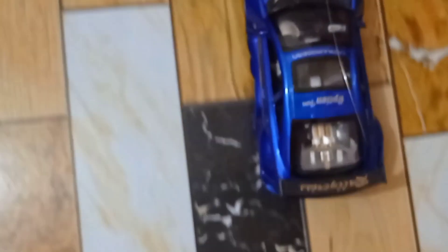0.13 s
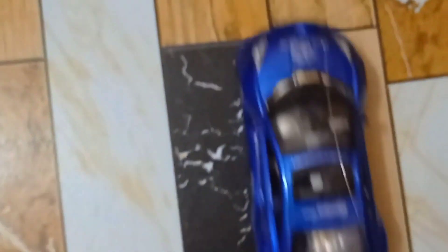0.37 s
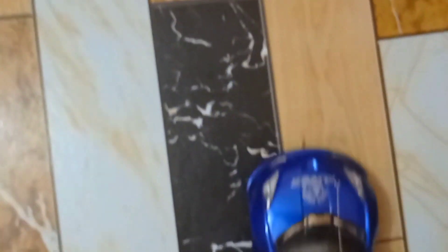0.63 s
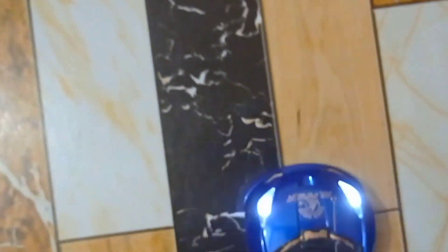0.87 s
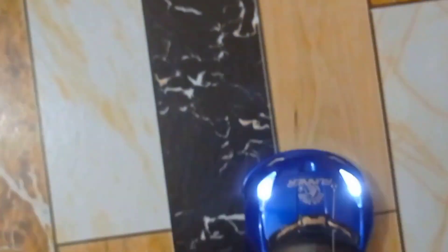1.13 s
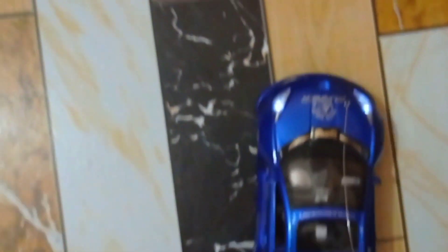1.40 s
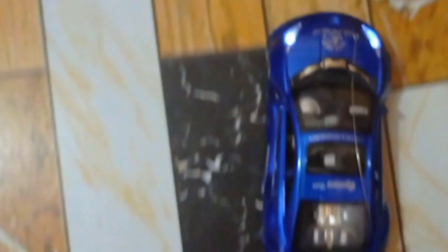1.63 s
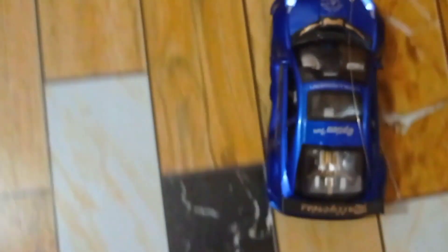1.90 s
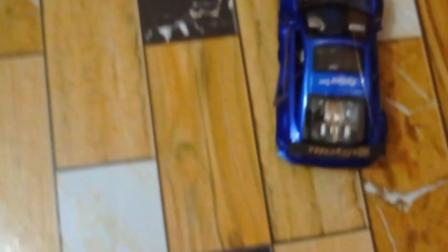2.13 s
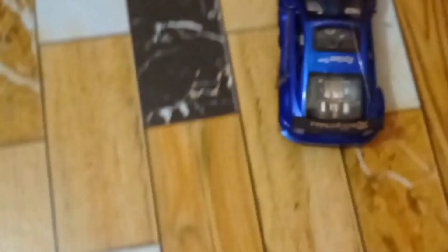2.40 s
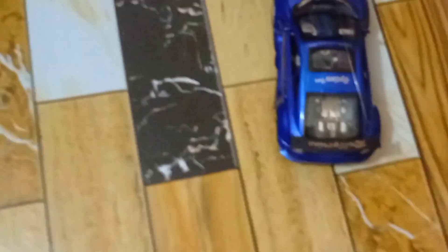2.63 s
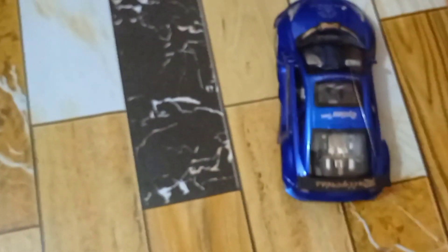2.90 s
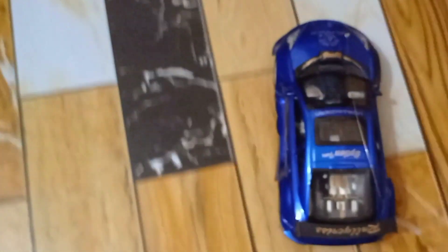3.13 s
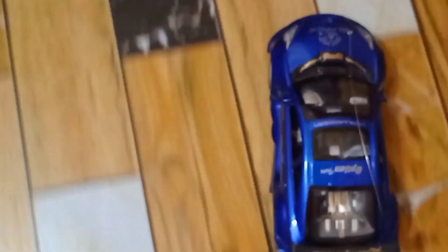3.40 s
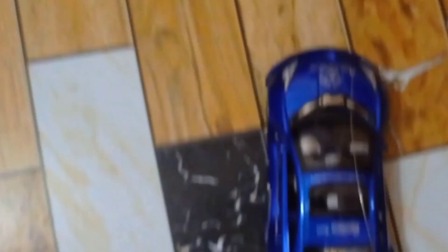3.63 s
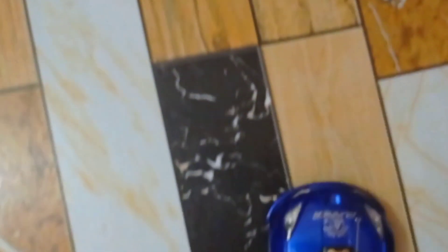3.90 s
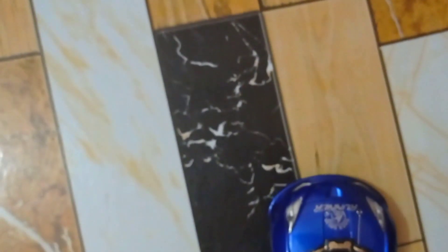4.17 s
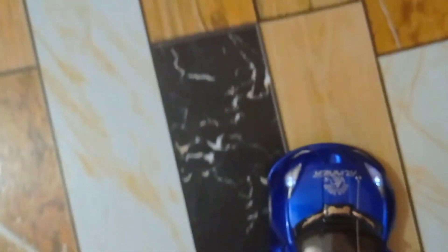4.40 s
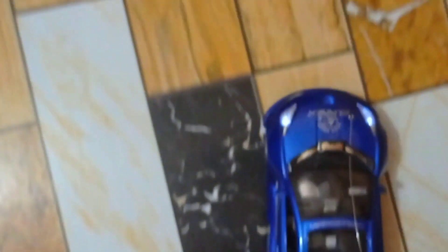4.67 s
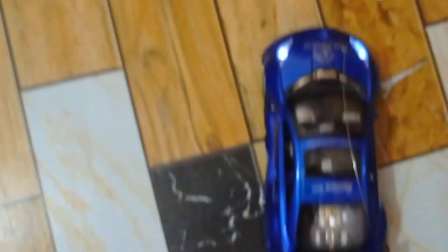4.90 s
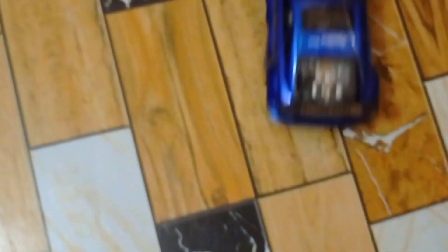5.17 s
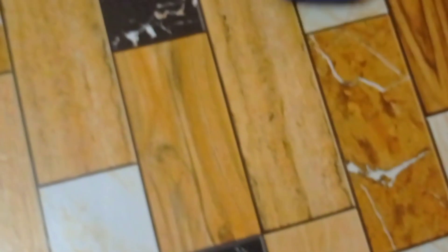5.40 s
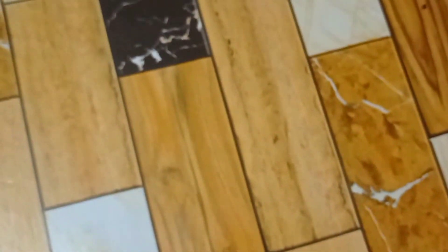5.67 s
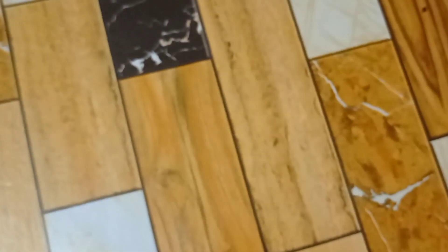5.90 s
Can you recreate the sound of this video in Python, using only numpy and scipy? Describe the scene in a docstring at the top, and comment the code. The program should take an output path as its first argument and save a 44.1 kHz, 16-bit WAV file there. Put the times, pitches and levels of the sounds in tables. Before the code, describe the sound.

In a quiet tiled room, a small toy car with a geared electric motor is heard close by. It is silent for an instant, then a gritty plastic whir with a thin gear whine starts abruptly, with ticks near 0.3 seconds and a hard knock at 0.7. Clustered rattling knocks and a brushing scrape mark a loud reversal around 0.9 to 1.05. The whir drops, swells again near 1.5, then fades from 2.2 into faint ticks. A dry controller snap comes at 2.6. From 2.9 the motor revs up, growing more tonal around 3.4, and stops by 3.95 with another snap. After near silence and small ticks, it builds from 4.3 to a strong whir near 5.1, bumping over joints; knocks at 5.4 precede its stop by 5.6. Soft hiss remains, then a weak whir and light ticks return from 5.8 to the end.

```python
"""Tiled floor of a quiet room: a small toy car with a geared electric motor runs back and forth below a mono microphone.
Random blows of the gear teeth rattle the plastic shell; the motor's turning orders glide through low resonances.
Decaying modes make the knocks and ticks of stops, reversals and tile joints, and the hand controller's snaps.
Filtered noise makes the underside's brushing, the air, the hiss and the low rolling in the floor."""
import sys
import numpy as np
from scipy import signal
from scipy.io import wavfile
from scipy.ndimage import uniform_filter1d

SR = 44100
rng = np.random.default_rng(int(sys.argv[2]) if len(sys.argv) > 2 else 0)


def volts_from_db(level):
    """Convert decibel levels to linear amplitude ratios."""
    exponent = np.asarray(level, float) / 20
    return 10 ** exponent


def store_wav(level_fs):
    """Save 16-bit WAV to argv[1]."""
    pcm = np.round(np.clip(np.atleast_2d(level_fs), -1, 1) * 32767)
    wavfile.write(sys.argv[1], SR, pcm.T.astype(np.int16))


N = 266319

# modes of the plastic shell: mode_hz, level_db, t60_s (before a blow's ring factor)
SHELL = [(358, 5.5, 0.08), (414.3, 6.5, 0.54), (443, 5.5, 0.053), (513, 2.5, 0.18), (654, 8.5, 0.081),
         (770, 12.5, 0.12), (1034, 7.5, 0.11), (1230, -3.5, 0.22), (1450, 7, 0.079), (1873, 4, 0.04),
         (2090, 11.5, 0.087), (2290, 21, 0.0053), (2638, 7, 0.23), (3224, 9.5, 0.22), (3620, 8.5, 0.045),
         (3820, 13.5, 0.034), (4294, 13.5, 0.022), (4750, 11.5, 0.13), (5100, 17.5, 0.0045),
         (5730, 9.5, 0.015), (6470, -4.5, .02)]
# wheels jolting over tile joints: centre_s, half_length_s, low_shell_db, floor_db
JOLTS = [(0.077, 0.14, -50.5, -51.5), (0.305, 0.12, -52.5, -59), (.664, 0.025, -33.5, -48),
         (.684, 0.01, -26, -39), (0.734, 0.16, -44, -46), (0.918, 0.011, -39, -72),
         (0.969, 0.021, -34.5, -67), (1.053, 0.34, -50, -54.5), (1.188, 0.047, -65, -64),
         (1.41, 0.063, -81, -66), (1.565, 0.061, -56, -56), (1.663, .05, -59, -55),
         (2.004, 0.039, -40, -60), (3.309, 0.048, -37.5, -72), (3.749, 0.17, -72, -61),
         (4.467, 0.062, -82, -55), (4.929, .06, -52, -63), (5.02, 0.074, -55, -78),
         (5.107, 0.082, -38, -47.5), (5.214, 0.037, -35, -48), (5.291, 0.078, -34.5, -51),
         (5.385, 0.068, -32.5, -52), (5.493, 0.04, -40, -52), (5.81, 0.15, -55, -57.5),
         (5.953, 0.07, -50.5, -62), (6.013, 0.032, -43, -64)]


def evened(x):
    """Scales a signal to rms 1."""
    return x / np.sqrt(np.mean(x ** 2) + 1e-20)


def read(points, hz):
    """Reads a spectrum table on a log-frequency axis."""
    point_hz, value = np.transpose(points)
    return np.interp(np.log(hz + 1), np.log(point_hz + 1), value)


def shaped(x, gain, size=1024):
    """Multiplies the short-time spectrum of x by gain(hz)."""
    hz, _, z = signal.stft(x, SR, nperseg=size, noverlap=size * 3 // 4)
    return signal.istft(z * gain(hz[:, None]), SR, nperseg=size, noverlap=size * 3 // 4)[1][:len(x)]


def bells(rows, column):
    """Power over time of brief events, each a smooth bell as high as the dB in its column."""
    power = np.zeros(N)
    for row in rows:
        bell = signal.windows.hann(round(2 * row[1] * SR) + 2) ** 4
        at = np.arange(len(bell)) + round(row[0] * SR) - len(bell) // 2
        inside = (at >= 0) & (at < N)
        power[at[inside]] += volts_from_db(2 * row[column]) * bell[inside]
    return power


def ring(weights_db, ring_factor, size=4096):
    """One blow on the shell: its modes start together and die away exponentially."""
    t = np.arange(size) / SR
    blow = np.zeros(size)
    for (hz, db, t60), weight_db in zip(SHELL, weights_db):
        envelope = volts_from_db(db + weight_db - 60 * t / (t60 * ring_factor))
        blow += envelope * np.sin(2 * np.pi * hz * t) / np.sqrt(t60)
    return blow


def effort(t):
    """How hard the gears work at times t: effort above usual, lean to the whine and treble, in dB."""
    # time_s, effort_db, lean_db (to the whine as the gearbox faces the microphone),
    # treble_db (as the car nears); each band weighs the three in its own way
    course = [(.066, -40, -6, -13), (.078, -37, 1, 6), (0.145, -40, -4.5, -3), (.274, -34.5, -2.5, -2),
              (0.319, -40.5, 1.5, 4), (.33, -34.5, -1, -1.5), (.4, -33.5, -1.5, 0), (.44, -38.5, -1.5, 8),
              (.462, -38, -2, 0), (.5, -38, -2, 6), (.52, -37, 1, 3), (.63, -39, -4.5, 10.5),
              (.655, -39, -2, 0), (.7, -35, 1, 2), (.778, -39.5, -1, 1.5), (.836, -32.5, -3.5, -8),
              (.932, -32, -3, -9), (.99, -30, -3.5, 0), (1.02, -27.5, 8, 0), (1.064, -26.5, -1, -1),
              (1.174, -42, -3, -7), (1.25, -40, -1, -3), (1.33, -39.5, -1, -7), (1.45, -35, 2.5, -15),
              (1.558, -34, 1, -4), (1.69, -40, 0, 10), (1.8, -39, -1, -3), (1.97, -36.5, 1, -3),
              (2.068, -40, 1.5, 4.5), (2.18, -43.5, 4, 2), (2.27, -45, 3, 1), (2.4, -53.5, -1, 8),
              (2.46, -58, 0, -1), (2.6, -63.5, 1, 23), (2.62, -62, 5, -5), (2.66, -54.5, 0, 0),
              (2.68, -56, 10, -5), (2.7, -50.5, -2, 7), (2.73, -64, -5, 11), (2.78, -52.5, -1, -4),
              (2.828, -57.5, -5, 9), (2.88, -52, -5, -8), (2.97, -44, -2.5, -8), (3.11, -41, -0.5, -4),
              (3.26, -40, 3, 1), (3.31, -37, -2, 9), (3.42, -35, -1, -2), (3.52, -35.5, -2.5, 3),
              (3.575, -34, 1, -5), (3.63, -33.5, -1, 5), (3.66, -35, -1.5, 3), (3.684, -30.5, 2, -3),
              (3.72, -32, -1, -2), (3.836, -35.5, -4, 10), (3.899, -47.5, 5, 8), (3.959, -53.5, -3.5, 3),
              (4.001, -55.5, 4, -5), (4.05, -77, 9, -4), (4.1, -62.5, -4, -12), (4.15, -51.5, -2, -6.5),
              (4.22, -51.5, -2.5, -7), (4.3, -48, -4.5, 2), (4.45, -41.5, -2, -2), (4.598, -38, -1, -6),
              (4.75, -35, 1, -5), (4.9, -35, 0, -2), (5.1, -31, 2, -7), (5.25, -34, 3, 3),
              (5.34, -37.5, 1.5, -5), (5.38, -36.5, 3.5, 6), (5.488, -38.5, 0, -2), (5.55, -51, 1, 6),
              (5.6, -58, -1, 3), (5.66, -64.5, -1, 0), (5.73, -74.5, -3.5, -8), (5.76, -60.5, -0.5, -6),
              (5.798, -46.5, 3.5, -16), (5.83, -49.5, -3, -4), (5.88, -51.5, -4, -6), (5.95, -47.5, -6, -6),
              (6.03, -46, -2, -3)]
    usual_db = -38
    s, effort_db, lean_db, treble_db = np.transpose(course)
    return np.interp(t, s, effort_db) - usual_db, np.interp(t, s, lean_db), np.interp(t, s, treble_db)


def shaft(t):
    """Motor shaft at times t: speed, tone level and level of the upper orders."""
    # time_s, turns_per_s, tone_db, upper_orders_db (added to all orders but the first)
    course = [(.07, 380, -66, 0), (0.199, 405, -71, -4.5), (.24, 420, -58, -1), (.3, 410, -51, 8),
              (.34, 410, -71, 0), (.43, 315, -63, -11), (.48, 300, -55.5, -5), (.56, 290, -68, 10),
              (.65, 260, -76, 0), (1.002, 380, -75, 0), (1.15, 193, -74, -14), (1.21, 216, -58, -10),
              (1.246, 240, -56, -13), (1.291, 270, -73, 17), (1.38, 305, -71, 19.5),
              (1.458, 316, -68, 15.5), (1.52, 380, -75, -11), (1.62, 376, -60.5, 6), (1.7, 430, -85, 0),
              (2.18, 490, -85, 16.5), (2.231, 394, -59, -21), (2.271, 410, -59, -13),
              (2.359, 320, -65, -10), (2.42, 250, -80, -6), (2.88, 302, -90, -6), (2.95, 325, -69, 1),
              (3.17, 325, -64, -2), (3.23, 325, -57, 11), (3.265, 340, -52.5, 9.5), (3.285, 396, -55, 6),
              (3.35, 396, -45, -3), (3.41, 404, -40.5, -4), (3.44, 425, -45, 13), (3.48, 415, -53, 0),
              (3.515, 476, -60.5, 11), (3.56, 484, -47, 14), (3.591, 487, -45, -6), (3.622, 497, -59.5, 16),
              (3.689, 505, -67, -2), (3.77, 435, -76, 2), (3.831, 410, -68, 13), (3.901, 204, -96, 0),
              (4.38, 170, -79, -13), (4.48, 250, -52, -20), (4.519, 280, -82, 7), (4.621, 275, -57.5, 8),
              (4.701, 370, -72.5, 1), (4.841, 400, -72, 0), (4.979, 420, -58, -19), (5.09, 497, -52, 6),
              (5.14, 484, -38.5, -22), (5.19, 530, -53, -6), (5.24, 470, -71, 5), (5.42, 357, -66, 2),
              (5.473, 326, -60, 13), (5.531, 335, -67.5, 1), (5.58, 286, -74, -3), (5.851, 300, -75, -7),
              (5.93, 335, -62, 0.5), (6.018, 395, -53, -11)]
    s, *columns = np.transpose(course)
    return [np.interp(t, s, column) for column in columns]


def background(air_db=-67, roll_db=-68):
    """Steady air and microphone hiss, and noise in the floor's low modes from rolling and jolting wheels."""
    # spectrum of air and hiss: point_hz, density_db (relative, per Hz)
    air_spectrum = [(18, -39), (30, 0.5), (286, -6.5), (382, -4), (566, -15.5), (1450, -31), (1750, -17.5),
                    (2520, -50.5), (2870, -10.5), (4730, -29), (10100, -30.5), (13500, -43), (15800, -43)]
    # floor: mode_hz, width_hz, level_db (relative)
    floor_modes = [(71, 190, 1), (99.2, 25, -2.5), (150, 24, -1), (210, 55, -3.5), (250, 50, -20.5)]

    def floor_gain(hz):
        return sum(volts_from_db(db) / (1 + (2 * (hz - f) / width) ** 2) for f, width, db in floor_modes)

    air = shaped(rng.standard_normal(N), lambda hz: volts_from_db(read(air_spectrum, hz)), size=2048)
    floor = shaped(rng.standard_normal(N), floor_gain, size=4096)
    floor_power = volts_from_db(2 * roll_db) + bells(JOLTS, column=3)
    return volts_from_db(air_db) * evened(air) + np.sqrt(floor_power) * evened(floor)


def room(x, t60=0.31, first_s=0.0058):
    """Room echoes: sparse taps of random sign, dying away, duller than the direct sound."""
    taps = np.zeros(SR // 2)
    at = np.arange(round(first_s * SR), SR // 2 - 20, 20)
    signs = rng.choice([-1., 1.], len(at))
    taps[at + rng.integers(0, 20, len(at))] = signs * volts_from_db(-60 * at / SR / t60)
    taps = signal.lfilter([1], [1, -.4], taps)  # dulls the echoes
    return signal.oaconvolve(x, taps / np.linalg.norm(taps))[:N]


def switch(crack=0.38, crack_s=0.025, crack_hz=6500, ring_factor=0.7, top_hz=7450):
    """The hand controller's dry plastic snaps: short decaying modes and a wide noise tick."""
    # start_s, level_db
    snaps = [(2.6157, -17.5), (3.9702, -22)]
    # one list for the press, one for the release: mode_hz, level_db, t60_s (before ring_factor)
    snap_modes = [
        [(717, -10, 0.15), (1320, -11, 0.13), (2370, 4.5, 0.046), (2785, 5.5, 0.054), (3180, 11.5, 0.018),
         (3700, -20, 0.023), (4860, 2.5, 0.05), (6470, -32, 0.022)],
        [(1680, -33, 0.022), (2020, 13, 0.019), (2780, -2, 0.032), (3520, -16, 0.012), (4600, -21, 0.015),
         (5800, 3.5, 0.0097), (9970, -2, 0.016)],
    ]
    out, t = np.zeros(N), np.arange(3000) / SR
    crack_band = signal.butter(2, [1500, crack_hz], "band", fs=SR)
    snap_band = signal.butter(2, [500, top_hz], "band", fs=SR)
    for (s, db), modes in zip(snaps, snap_modes):
        snap = sum(volts_from_db(d - 60 * t / (t60 * ring_factor)) * np.sin(2 * np.pi * hz * t)
                   for hz, d, t60 in modes)
        tick = signal.lfilter(*crack_band, rng.standard_normal(len(t)))
        snap = snap / abs(snap).max() + crack * tick * volts_from_db(-60 * t / crack_s)
        out[round(s * SR):][:len(t)] += volts_from_db(db) * signal.lfilter(*snap_band, snap)
    return out


def brushing(low_hz=6500, high_hz=9200, grain_db=4.0):
    """The underside brushing the tiles: thin, high noise with a grainy level."""
    # centre_s, half_length_s, level_db
    brushes = [(.075, 0.063, -58), (.675, .06, -53.5), (.72, 0.1, -51), (.76, 0.079, -58.5),
               (1.014, 0.05, -40), (1.69, 0.25, -64), (2.0, 0.12, -67), (2.18, 0.21, -68.5),
               (2.512, 0.022, -67.5), (2.57, 0.045, -68), (4.16, 0.018, -77), (3.12, .03, -69),
               (3.68, .03, -58), (4.62, .03, -72), (5.2, .15, -56), (5.37, .04, -56)]
    hiss = signal.lfilter(*signal.butter(3, low_hz, "high", fs=SR), rng.standard_normal(N))
    hiss = signal.lfilter(*signal.butter(3, high_hz, fs=SR), hiss)
    grain = volts_from_db(grain_db * evened(uniform_filter1d(rng.standard_normal(N), size=150)))
    return np.sqrt(bells(brushes, column=2)) * evened(hiss * grain)


def knocks(crack=0.42, crack_s=0.013, crack_top=1.8):
    """Each blow rings the shell modes near its own pitch; longer-ringing blows swell slower and crack less."""
    # start_s, level_db (of the ringing's peak), struck_hz, spread_octaves, ring_factor (at least 0.2 in the ringing)
    blows = [(.075, -21.5, 1130, 0.45, 0.38), (0.271, -32, 1060, 0.39, 1.7), (.326, -20.5, 4300, .36, 1.1),
             (.344, -26, 4300, 0.18, 1.6), (.37, -31.5, 2646, 0.14, 1.2), (0.66, -21, 413, 0.7, 0.26),
             (.681, -7.5, 1450, 0.45, 0.33), (0.716, -24.5, 890, 0.43, 0.48),
             (0.718, -21, 1840, 0.18, 0.54), (.767, -22.5, 540, 0.65, 0.16), (.819, -21, 1380, 0.7, 0.35),
             (.919, -18, 1180, 0.42, 0.29), (0.944, -23, 1230, 0.15, .72), (0.966, -16.5, 1140, 0.7, 0.36),
             (0.972, -14.5, 1280, 0.14, 0.29), (0.999, -19, 1310, 0.15, 0.4),
             (1.011, -14, 1320, 0.35, 0.71), (1.02, -14.5, 1174, 0.13, 0.25), (1.036, -14, 1450, .54, .41),
             (1.743, -19.5, 2070, 0.61, .2), (1.801, -31.5, 1080, 0.36, .79), (1.986, -40, 1027, .2, 2.8),
             (2.179, -45, 3793, 0.37, .52), (2.249, -38, 400, 0.17, 0.48), (2.291, -39.5, 355, 0.12, 0.51),
             (2.34, -37, 3620, 0.27, 0.27), (2.396, -43.5, 3840, .47, 0.79), (2.468, -55, 3700, 0.73, 0.31),
             (2.529, -52, 2600, 0.9, .4), (2.5768, -40, 5300, .7, 0.21), (2.683, -38, 3000, 0.96, 0.44),
             (2.699, -54, 1444, 0.42, .52), (2.85, -50, 3560, .24, 0.75), (2.909, -44, 1193, 0.46, 0.47),
             (2.957, -37, 3600, 0.19, .67), (3.123, -34, 1030, 0.18, 0.31), (3.302, -25.5, 1043, 0.19, 0.2),
             (3.669, -30, 1044, 0.26, 1.13), (3.921, -35, 2190, 0.41, .6), (4.082, -50, 4000, .37, .54),
             (4.102, -50, 2170, .45, 0.74), (4.132, -35, 2090, 0.59, .38), (4.211, -41, 1230, 0.26, .54),
             (4.326, -39, 1260, 0.2, .6), (5.199, -36, 449, .18, .98), (5.269, -30.5, 435, 0.15, 1.5),
             (5.364, -22, 750, 0.2, 0.45), (5.3662, -19, 3160, 0.74, .2), (5.379, -26, 753, 0.49, .87),
             (5.461, -32.5, 621.6, 0.32, 0.93), (5.648, -52, 3520, 0.26, 0.57),
             (5.759, -44, 2630, 0.37, 0.96), (5.804, -38, 3527, 0.19, 0.44), (5.955, -34, 760, 0.53, 0.79),
             (6.0, -39, 398, 0.12, 1.17)]
    out, t = np.zeros(N + 4096), np.arange(4096) / SR
    mode_hz = np.transpose(SHELL)[0]
    for s, db, struck_hz, spread, ring_factor in blows:
        crack_band = signal.butter(3, [struck_hz / 2, crack_top * struck_hz], "band", fs=SR)
        noise = evened(signal.lfilter(*crack_band, rng.standard_normal(4096))) / 2
        rise_ms = 0.34 + 0.23 * ring_factor
        weights_db = -12 * (np.log2(mode_hz / struck_hz) / spread) ** 2
        blow = ring(weights_db, max(ring_factor, .2))
        blow *= 1 - np.exp(-1000 * t / rise_ms)
        blow = blow / abs(blow).max() + crack * noise * volts_from_db(-60 * t / crack_s) / (1 + rise_ms)
        at = round(s * SR)
        out[at:at + 4096] += volts_from_db(db) * blow
    return out[:N]


def motor(gear_ratio=13, waver=0.018, throb=0.5, broken_db=4.5, direct=0.61):
    """Unsteady orders of the shaft ring the housing as they cross its resonances; an eccentric gear makes them throb."""
    # first to fourth order of the shaft: level_db
    orders_db = [-2.2, -6.5, -16.5, -29.5]
    # housing resonances: resonance_hz, width_hz, gain_db
    housing = [(223, 10, 13), (398, 44, 6.5), (484, 75, 10), (667, 31, 22), (897, 120, 9), (1047, 89, 19.5),
               (1185, 82, 10.5)]
    hz, tone_db, upper_db = shaft(np.arange(N) / SR)
    wavering = evened(uniform_filter1d(rng.standard_normal(N), size=400))
    turns = np.cumsum(hz * (1 + waver * wavering)) / SR
    swell = 1 + throb * np.cos(2 * np.pi * (turns / gear_ratio + rng.random()))
    # loose mesh breaks the tone up
    swell *= volts_from_db(broken_db * evened(uniform_filter1d(rng.standard_normal(N), size=500)))
    orders = sum(volts_from_db(db + (k > 1) * upper_db) * np.sin(2 * np.pi * k * turns)
                 for k, db in enumerate(orders_db, start=1))
    orders = swell * volts_from_db(tone_db) * orders
    rung = sum(volts_from_db(db) * signal.lfilter(*signal.iirpeak(f, f / width, SR), orders)
               for f, width, db in housing)
    return direct * orders + rung


def tooth_blows(over_db, per_s=2200, quiet_db=-1.0, uneven_db=-1.5, hiss=0.8, scatter_s=0.006):
    """Teeth strike at random, denser with effort up to per_s; scattered blows over a steady noise drive the shell."""
    rate = per_s * np.clip(volts_from_db(over_db - quiet_db), .05, 1)
    size = volts_from_db(uneven_db * np.minimum(rng.exponential(1, N), 4)) * rng.choice([-1., 1.], N)
    teeth = size * (rng.random(N) < rate / SR) / np.sqrt(rate)
    # each blow scatters through the gearbox for a few milliseconds along one of 24 paths
    paths = rng.standard_normal((24, 400)) * volts_from_db(-60 * np.arange(400) / SR / scatter_s)
    chosen = rng.integers(0, len(paths), N)
    scattered = sum(signal.oaconvolve(teeth * (chosen == k), path)[:N] for k, path in enumerate(paths))
    return evened(scattered) + hiss * rng.standard_normal(N)


def whine_gain(hz, over_db, lift_db=3.5, width_hz=260):
    """The gears' whine: a peak that climbs with effort, and stands out more and narrows as effort falls."""
    slack_db = np.clip(-over_db, -8, 20)
    centre_hz = 4000 + 21.5 * over_db
    offset = (hz[:, None] - centre_hz) * np.exp(0.053 * slack_db) / width_hz
    return volts_from_db((lift_db + 0.36 * slack_db) * np.exp(-offset ** 2))


def gears(broad=0.94, patchy_db=2.5, flicker_db=1.39):
    """Tooth blows ring the shell and sound directly; bands of this rattle swell with load and distance."""
    # broad colour of the rattle: point_hz, density_db (relative, per Hz)
    colour = [(88, -49.5), (150, -75), (285, -32), (397, 5), (564, -11), (647, 0.5), (771, -24.5),
              (993, -13.5), (1680, -15), (2630, -3), (2900, -12), (4120, -16.5), (6450, -15.5),
              (8150, -37.5), (15800, -71.5)]
    # edges between the bands, in Hz
    splits_hz = [550, 800, 1600, 3000, 5000, 7500]
    # bands, low to high: level_db (at usual effort), then dB per dB: per_effort, per_lean, per_treble
    bands = [(-59.5, 0.65, -.5, 0.58), (-57.5, 0.45, -.6, -.1), (-42.5, 1.1, -.9, -0.041),
             (-45, 0.98, -.7, 0.13), (-41.5, 1.15, .4, -0.12), (-48, 1.33, .3, 0.24),
             (-61.5, 1.44, .1, 0.19)]
    t = np.arange(N) / SR
    over_db, lean_db, treble_db = effort(t)
    drive = tooth_blows(over_db)
    rung = signal.oaconvolve(drive, ring(np.zeros(len(SHELL)), 0.87))[:N]
    rung = shaped(rung, lambda hz: volts_from_db(read(colour, hz)))
    direct = shaped(drive, lambda hz: volts_from_db(read(colour, hz)), size=256)
    rattle = evened(rung) + broad * evened(direct)

    hz, frames, z = signal.stft(rattle, SR, nperseg=1024, noverlap=896)
    # the path to the microphone changes as the car moves: colour patches drift
    patches = rng.standard_normal((len(hz), len(frames)))
    patches = uniform_filter1d(uniform_filter1d(patches, size=3, axis=0), size=40, axis=1)
    z *= volts_from_db(patchy_db * evened(patches))
    z *= volts_from_db(flicker_db * evened(uniform_filter1d(rng.standard_normal(len(frames)), size=5)))
    z *= whine_gain(hz, effort(frames)[0])

    # the two lowest bands rattle more the faster the shaft turns: 8 dB per octave
    speed_db = 8 * np.log2(shaft(t)[0] / 400)
    jolted = bells(JOLTS, column=2)
    jolt_power = [jolted, jolted * volts_from_db(2 * -8), 0, 0, 0, 0, 0]  # second band 8 dB lower
    below = [0 * hz] + [1 / (1 + (hz / f) ** 16) for f in splits_hz] + [1 + 0 * hz]
    out = np.zeros(N)
    for k, (db, per_effort, per_lean, per_treble) in enumerate(bands):
        band_gain = (below[k + 1] - below[k])[:, None]
        part = signal.istft(z * band_gain, SR, nperseg=1024, noverlap=896)[1][:N]
        level_db = db + per_effort * over_db + per_lean * lean_db + per_treble * treble_db
        power = volts_from_db(2 * (level_db + (k < 2) * speed_db))
        out += evened(part) * np.sqrt(power + jolt_power[k])
    return out


def scene():
    """Background, room, controller and car, the same in both channels."""
    blows, snaps = knocks(), switch()
    echoes = room(volts_from_db(-18.5) * blows + volts_from_db(-14.0) * snaps)
    mix = background() + echoes + snaps + brushing() + blows + motor() + gears()
    return np.array([mix, mix])


def band_limit(x):
    """A steep low-pass at the top of the band."""
    return signal.sosfilt(signal.butter(12, 16440, fs=SR, output="sos"), x)


def record(dry, low_hz=75.3, start_s=0.059):
    """Microphone: bass cut and capsule resonance; silent until start_s, then a 2 ms fade-in."""
    # capsule resonance: peak_hz, width_hz, gain_db
    capsule = (15200, 1500, 16)
    hz, width, db = capsule
    cut = signal.lfilter(*signal.butter(2, low_hz, "high", fs=SR), dry)
    bright = cut + (volts_from_db(db) - 1) * signal.lfilter(*signal.iirpeak(hz, hz / width, SR), cut)
    fade_in = np.clip((np.arange(N) / SR - start_s) / 0.002, 0, 1)
    return band_limit(bright * fade_in)


dry = scene()
out = record(dry)
store_wav(out)
```